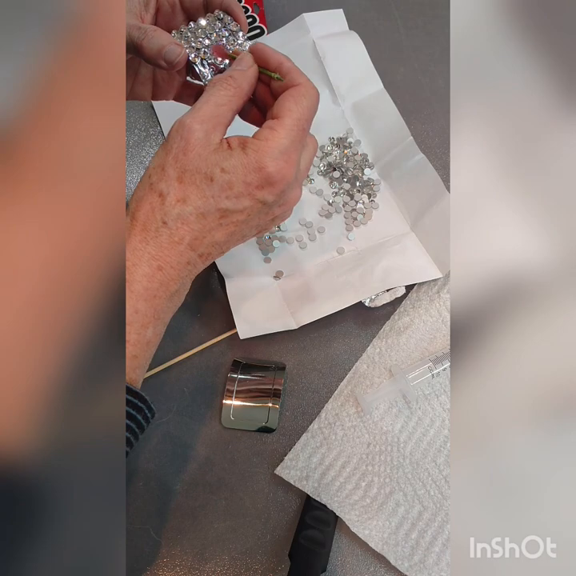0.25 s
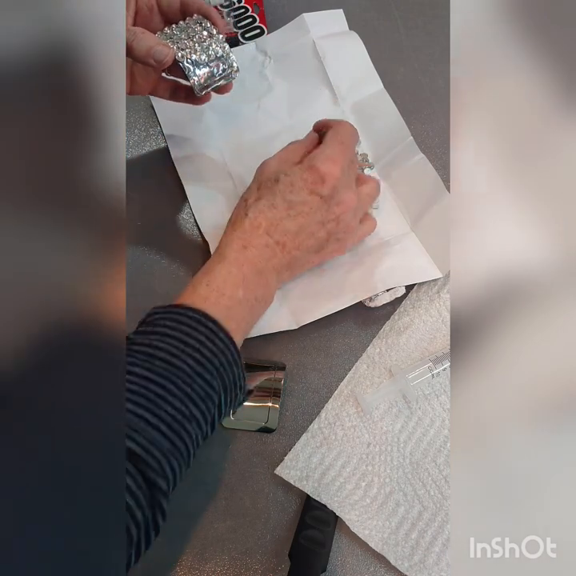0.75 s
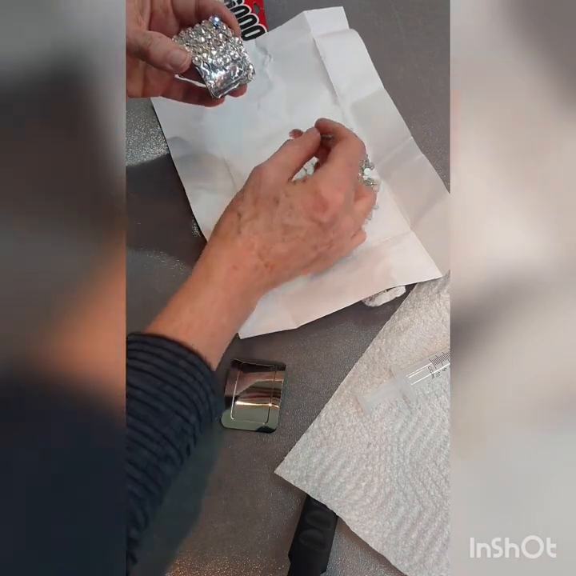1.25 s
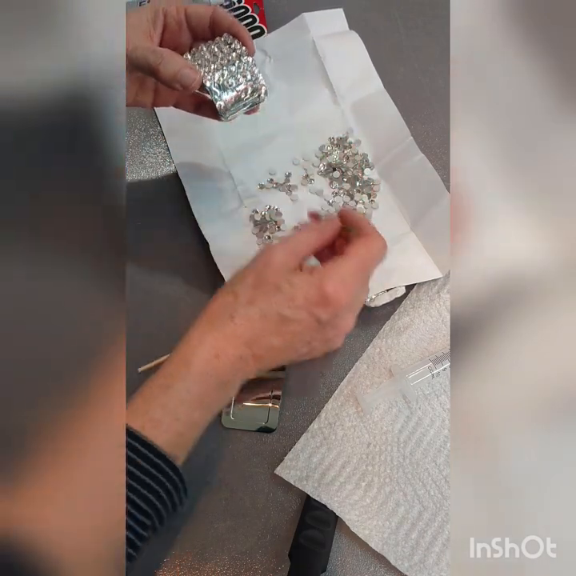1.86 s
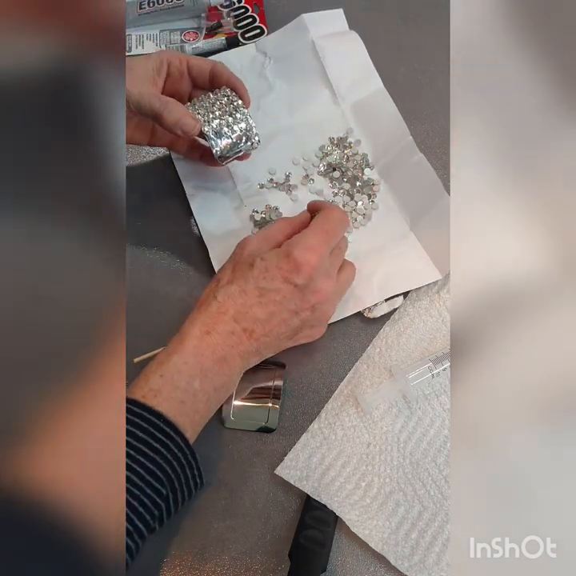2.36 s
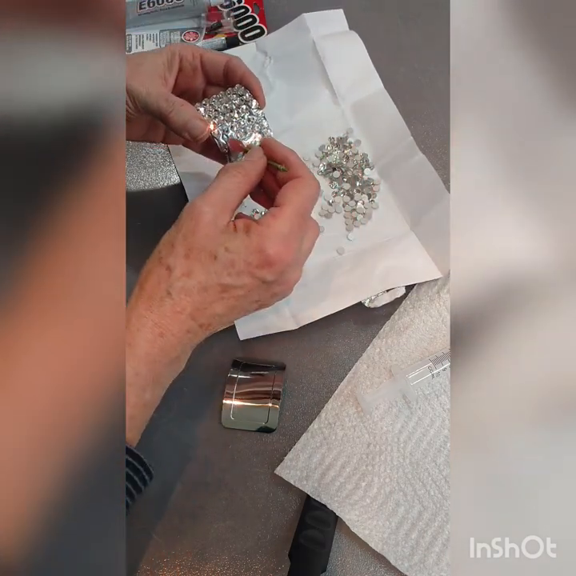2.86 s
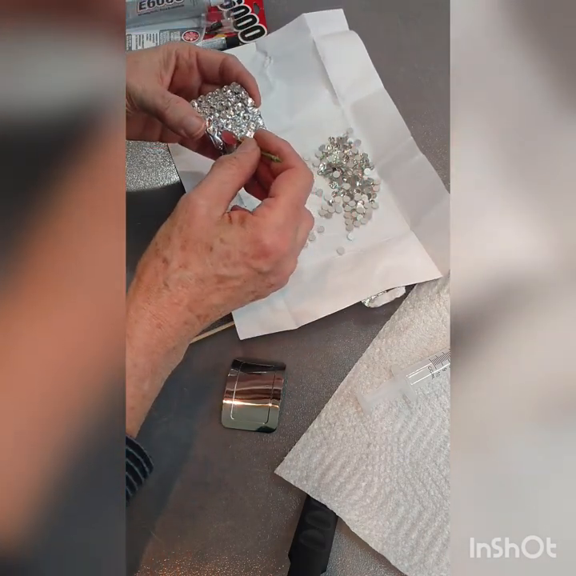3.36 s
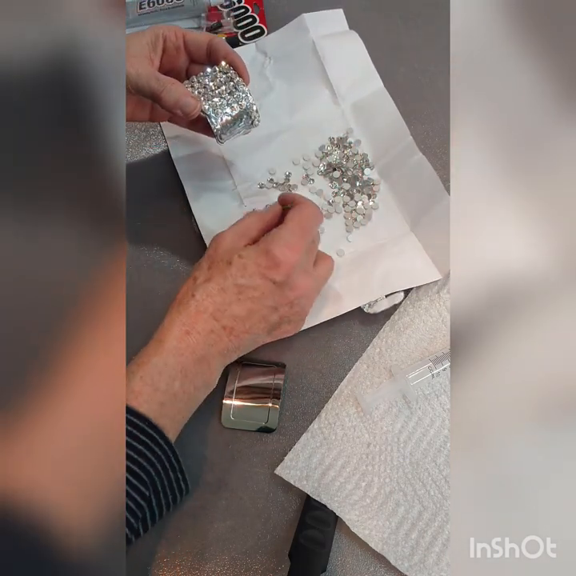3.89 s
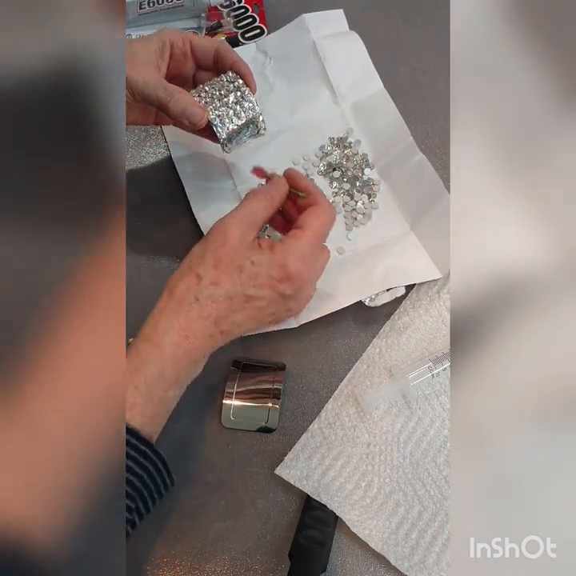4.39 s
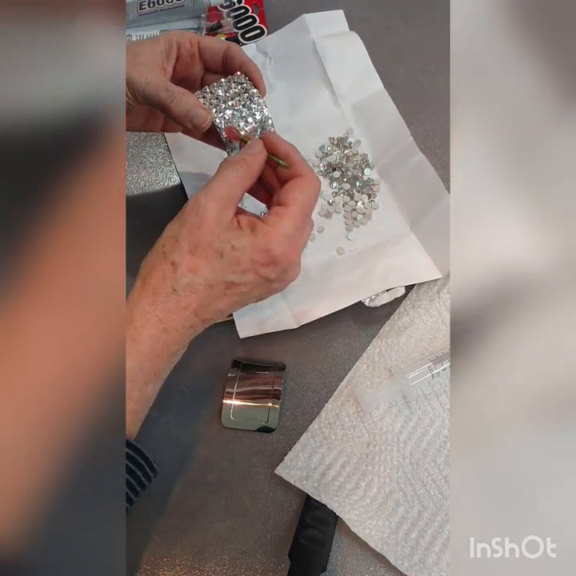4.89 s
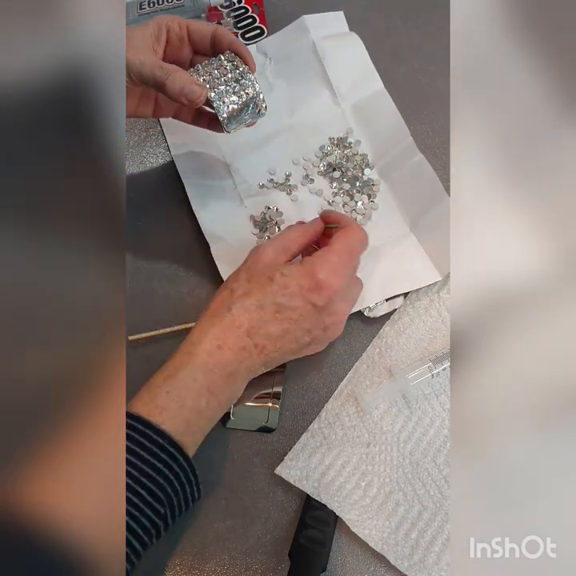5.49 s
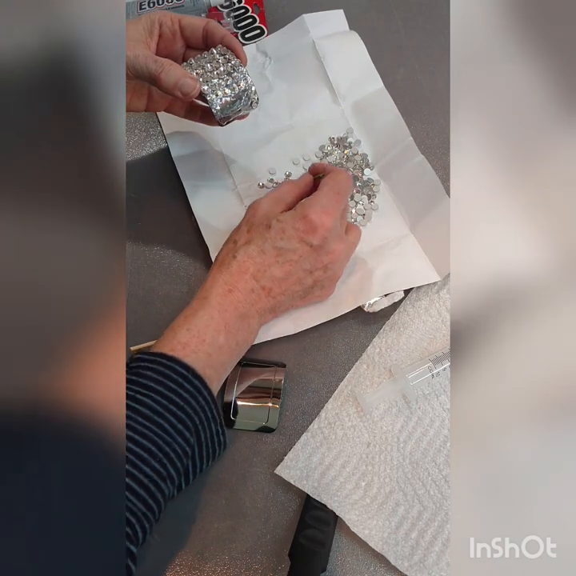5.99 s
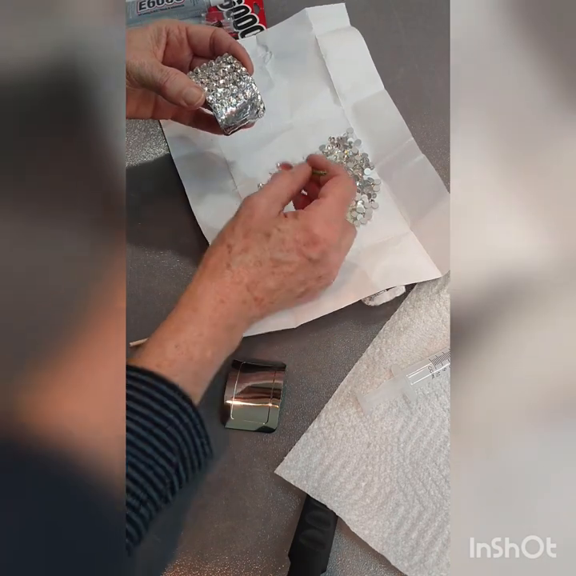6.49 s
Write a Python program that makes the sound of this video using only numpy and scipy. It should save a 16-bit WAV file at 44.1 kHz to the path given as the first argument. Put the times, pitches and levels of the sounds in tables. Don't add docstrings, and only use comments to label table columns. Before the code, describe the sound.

Close to a phone in a quiet room, fingers pick through tiny crystals lying on paper. Soft hiss and faint hum come first, then a busy burst of dry snaps, clicks and gritty rubbing. After a lull with a few dull taps, a shorter picking follows, then another pause and a last burst with longer scrapes, sharp knocks and paper crackle. Wide stereo, with a short dull room tail.

```python
import sys
import numpy as np
from scipy import signal
from scipy.fft import rfft, irfft, next_fast_len
from scipy.io import wavfile

SR = 44100
rng = np.random.default_rng(int(sys.argv[2]) if len(sys.argv) > 2 else 0)


def wav_out(sig):
    wavfile.write(sys.argv[1], SR, np.round(np.clip(np.atleast_2d(sig).T, -1, 1) * 32767).astype(np.int16))


def linear_from_db(decibels):
    return 10 ** (np.asarray(decibels, float) / 20)


N = 297234

# frequency_hz, density_db (per Hz)
AIR_SPECTRUM = [(20, -18), (60, 2), (120, 2.5), (200, 0.5), (400, -5.5), (800, -9), (1500, -13.5),
                (3000, -14.5), (6000, -18), (10000, -20.5), (15500, -28)]
# middle_s, spread_s, level_db
TABLE_LEANS = [
    (2.2, 0.29, -63.5),
    (3.3, 0.63, -78.5),
    (4.5, 0.42, -76),
    (5.55, 0.074, -62),
    (6.0, 0.11, -63),
    (6.56, 0.2, -68),
]
# frequency_hz, width_hz, level_db
SHEET_MODES = [(314, 610, -12), (574, 280, -3), (1320, 2060, -4.5), (2060, 840, 4)]
# frequency_hz, width_hz, level_db
STONE_MODES = [(2700, 1400, -1), (3800, 1600, -1), (5600, 2000, 0)]
# frequency_hz, width_hz, level_db
FIBRE_MODES = [(1940, 1000, -5.5), (3730, 2300, 0.5), (4990, 370, 6), (7040, 2900, 1)]
# frequency_hz, width_hz, level_db
SPARKLE_MODES = [(8640, 4700, 31), (13500, 12000, 1)]
PORT_DELAYS = (3, 2, 0)
# most_pressure_s, rise_s, fall_s, level_db, lightness_db (stones over sheet)
FINGER_DRAGS = [(.85, .04, 0.22, -60.5, 3), (1.036, 0.032, 0.062, -60, -3), (1.171, 0.082, 0.14, -59, 4),
                (1.255, 0.1, 0.016, -59.5, 4), (1.912, 0.026, 0.077, -52, -5),
                (2.004, 0.05, 0.088, -46.5, -0.5), (2.4, 0.089, 0.06, -54.5, -1.5),
                (3.76, 0.056, 0.21, -60, -1.5), (3.976, 0.094, 0.053, -44.5, 5.5),
                (4.165, 0.25, 0.031, -54, -2), (4.242, 0.059, 0.11, -54.5, -1.5),
                (4.37, 0.33, .07, -57, 10), (5.568, 0.045, 0.014, -56.5, -2), (5.69, 0.15, 0.5, -50.5, 2),
                (5.88, 0.16, 0.13, -48.5, 8), (5.99, 0.16, 0.13, -48, 6.5), (6.52, 0.19, 0.036, -50.5, 3),
                (6.54, .04, 0.036, -67, -5)]
# middle_s, length_s, level_db, lightness_db
FINGER_SCUFFS = [(1.585, 0.048, -49, -1.5), (1.642, 0.046, -57, -7.5), (2.058, 0.059, -51, -4),
                 (2.099, 0.21, -55.5, -3), (2.22, 0.053, -58.5, -5), (2.265, 0.056, -46, 0),
                 (2.472, 0.072, -50, -1), (3.832, 0.033, -42, 6), (6.314, 0.074, -45, 1),
                 (6.346, 0.059, -42, -1.5), (1.95, 0.054, -48, -1.5), (6.36, 0.037, -39.5, -9.5),
                 (6.393, 0.12, -52.5, -2)]
# middle_s, length_s, level_db
STONE_GLINTS = [
    (2.083, .06, -58),
    (2.266, 0.054, -54),
    (3.836, .022, -48.5),
    (4.158, 0.032, -60),
    (5.902, 0.14, -51.5),
]
# start_s, peak_db, t60_s
FINGER_TAPS = [(1.927, -38, 0.023), (2.869, -51, 0.02), (2.885, -53, 0.04), (3.077, -43, 0.03),
               (3.806, -53, 0.02), (3.821, -41, 0.023), (4.2657, -36, 0.018), (4.2785, -42, 0.018),
               (4.291, -42, 0.028), (6.456, -34, 0.016), (6.468, -39, 0.02), (6.528, -38, 0.04)]
# start_s, peak_db, thump_db, sparkle_db, t60_s
HEAP_CRUNCHES = [(0.825, -51, -21, -18, 0.05), (1.4674, -34, -11, -17, 0.081),
                 (1.4762, -33, -4, -17, 0.035), (1.5431, -25, -12.5, -22.5, 0.019),
                 (1.5902, -26.5, -11, -18.5, 0.052), (1.7656, -39, -3.5, -10, 0.16),
                 (1.8136, -50, 1, -11, 0.025), (1.9053, -37.5, -8.5, -41, 0.074),
                 (1.9999, -27.5, -5, -53, 0.034), (2.0526, -34, 6, -14, 0.031),
                 (2.2352, -35.5, -4, -30, 0.038), (2.257, -33.5, -9, -24, 0.056),
                 (2.4456, -22.5, -8.5, -41, 0.049), (3.8591, -53, 5, -22, 0.064),
                 (4.1087, -41, -15, -19, 0.033), (4.2302, -39, -10, -15, 0.052),
                 (6.2988, -35, -7, -12.5, 0.084)]
# start_s, peak_db, thump_db, sparkle_db
DRY_SNAPS = [
    (1.4626, -17.5, -8, -24.5),
    (1.6098, -28.5, -14, -35),
    (2.4227, -18, -8.5, -23),
    (1.8089, -35, 0, -8),
    (5.5753, -40, 9.5, -40),
]
# start_s, peak_db, sparkle_db
STONE_TICKS = [(1.029, -51, -23), (1.0466, -50, -18), (1.056, -56, -9), (1.12, -53, -14),
               (1.2508, -65, -18), (1.664, -45.5, -28), (1.7575, -42, -28), (1.7914, -40, -15),
               (1.8925, -37, -40), (1.961, -36, -44), (2.1987, -37.5, -12), (2.3252, -49, -15),
               (2.416, -39, -28), (3.7362, -53, -35), (4.0296, -46, -39), (4.0418, -43.5, -23),
               (4.142, -44, -10), (5.453, -42, -27), (5.467, -38, -40), (5.4993, -40.5, -40),
               (5.533, -53, -7)]
# start_s, peak_db, thump_db, sparkle_db, crackle_t60_s
HARD_KNOCKS = [(1.4641, -23, -16.5, -18, 0.067), (1.6267, -34, -7.5, -29, 0.054),
               (1.7763, -28, -48, -32, 0.1), (1.8022, -25, -48, -31, .06), (2.0578, -28.5, -8, -32, 0.078),
               (2.1578, -28, -9, -17.5, 0.17), (2.45, -26, -5, -31, 0.1), (3.8537, -21.5, -6, -23, 0.053),
               (5.4727, -35, -12.5, -31, 0.18), (5.5749, -29, -6.5, -43, 0.065),
               (6.305, -42, -34, -43, 0.16), (6.357, -20.5, -12, -40, 0.076)]


def ports(x, like, count=0):
    like = np.clip(like, 0, 1)
    shared = np.array([x[0], np.roll(x[0], count)])
    return np.sqrt(like) * shared + np.sqrt(1 - like) * x[1:]


def air():
    level_db, mains_db, mains_hz = -59, -67, 120
    t = np.arange(N) / SR
    size = next_fast_len(N)
    hz = np.arange(size // 2 + 1) * SR / size + 1
    table_hz, table_db = np.transpose(AIR_SPECTRUM)
    colour = linear_from_db(np.interp(np.log(hz), np.log(table_hz), table_db))
    spectrum = rfft(rng.standard_normal((3, size))) * colour
    hiss = irfft(ports(spectrum, 0.49 / (1 + (hz / 400) ** 2)), size)[:, :N]
    sway = linear_from_db(0.38 * np.interp(t, np.arange(30) / 4, rng.standard_normal(30)))
    hum = linear_from_db(mains_db) * np.sin(2 * np.pi * mains_hz * t)
    return linear_from_db(level_db) * sway * hiss / np.std(hiss) + hum


def rumble():
    rest_db, rumble_db = -76, 6.5
    t = np.arange(N) / SR
    weight = linear_from_db(rest_db)
    for middle, spread, db in TABLE_LEANS:
        weight = weight + linear_from_db(db) * np.exp(-((t - middle) / spread) ** 2 / 2)
    band = signal.butter(2, [60, 230], "bandpass", fs=SR, output="sos")
    low = signal.sosfilt(band, rng.standard_normal((3, N)))
    return weight * linear_from_db(rumble_db) * ports(low, 0.71) / np.std(low)


def room(x):
    level_db, t60_s = -13, 0.2
    t = np.arange(int(.3 * SR)) / SR
    tail = rng.standard_normal((2, len(t))) * linear_from_db(-60 * t / t60_s) * (t > .004)
    tail = signal.lfilter([1], [1, -.6], tail)
    tail = tail / np.sqrt(np.sum(tail[0] ** 2))
    return linear_from_db(level_db) * signal.fftconvolve(x, tail, axes=1)[:, :N]


def bands(modes, hz):
    return sum(linear_from_db(db) * 1j * hz * w / (f * f - hz * hz + 1j * hz * w) for f, w, db in modes)


def colours(x, stone_modes, detune=0.94):
    length = x.shape[-1]
    size = next_fast_len(length)
    hz = np.arange(size // 2 + 1) * SR / size * detune
    spectrum = rfft(x, size)
    sheet = bands(SHEET_MODES, hz) / (1 + 1j * hz / 2600) ** 2
    stones = bands(stone_modes, hz) / (1 + 1j * hz / 7500) ** 3 / (1 + 1500 / (1j * hz + 1)) ** 2
    sparkle = bands(SPARKLE_MODES, hz) / (1 + 6500 / (1j * hz + 1)) ** 2
    layers = []
    for response in (sheet, stones, sparkle):
        gain = np.sqrt(np.mean(abs(response) ** 2))
        layers.append(irfft(spectrum * response, size)[..., :length] / gain)
    return layers


def grit(size, spread_db, grain_s):
    grain = max(int(grain_s * SR), 1)
    heights = np.minimum(rng.exponential(size=size), 4)[:size // grain + 1]
    jumps = np.repeat(linear_from_db(spread_db * heights), grain)[:size]
    return rng.standard_normal((3, size)) * jumps / np.sqrt(np.mean(jumps ** 2))


def mix(layers, low_db, mid_db, high_db):
    likeness = (.7, .25, .35)
    sheet, stones, sparkle = (ports(x, like, lag) for x, like, lag in zip(layers, likeness, PORT_DELAYS))
    shade = linear_from_db(np.array([[1.5], [-1.5]]))
    return linear_from_db(low_db) * sheet + shade * (linear_from_db(mid_db) * stones + linear_from_db(high_db) * sparkle)


def scrapes():
    sheet_db, glint_db, scrape_db = -4.5, -10, 1.5
    stroke_round = 1.9
    t = np.arange(N) / SR
    power = np.full((3, N), 1e-12)
    scuffs = [(s, length / 2, length / 2, db, light) for s, length, db, light in FINGER_SCUFFS]
    for s, rise, fall, db, light_db in FINGER_DRAGS + scuffs:
        stroke = np.interp(t, [s - rise, s, s + fall], [0, 1, 0]) ** stroke_round
        balance_db = np.array([[sheet_db - light_db], [0], [glint_db]])
        power += linear_from_db(2 * (db + balance_db)) * stroke
    for s, length, db in STONE_GLINTS:
        power[2] += linear_from_db(2 * db) * np.interp(t, [s - length / 2, s, s + length / 2], [0, 1, 0])
    low_db, mid_db, high_db = 10 * np.log10(power) + scrape_db
    grains = grit(N, spread_db=1.8, grain_s=.001)
    return mix(colours(grains, FIBRE_MODES), low_db + 0.5, mid_db, high_db + .5)


def add(out, s, shape, lead, db, low_db, high_db):
    contact = 2.2
    burst = shape * grit(len(shape), spread_db=1.8, grain_s=.0007)
    weighted = np.sum((shape * burst) ** 2, axis=1, keepdims=True)
    burst = burst * np.sqrt(np.sum(shape ** 4) / weighted)
    burst[:, lead + 12] += contact * shape[lead]
    brightness_db = np.clip(.15 * (high_db + 20), -2.5, 1.5)
    detune = linear_from_db(.5 * rng.standard_normal() - brightness_db)
    hit = mix(colours(burst, STONE_MODES, detune), db + low_db + 5.5, db, db + high_db + 5.5)
    i = int(s * SR) - lead + 16
    out[:, i:i + len(shape)] += hit[:, :N - i]


def ticks():
    tick_db, crunch_db = -6, -5.5
    tick_s, rise_s, swell_s = .0008, .0003, .0052
    out, size, lead = np.zeros((2, N)), 8192, 128
    t = (np.arange(size) - lead) / SR
    after = np.maximum(t, 0)
    # start_s, peak_db, thump_db, sparkle_db, t60_s, crackle_db
    blows = [(*row, -4.5) for row in HARD_KNOCKS]
    blows += [(s, db, -9, high_db, 0.12, -2.5) for s, db, high_db in STONE_TICKS]
    blows += [(*row, 0.064, -15) for row in DRY_SNAPS]
    for s, db, low_db, high_db, t60, crackle_db in blows:
        decay = np.exp(-after / tick_s) + linear_from_db(crackle_db - 60 * after / max(t60, .005))
        onset = np.exp(np.minimum(t, 0) / rise_s)
        add(out, s, decay * onset, lead, db + tick_db, low_db, high_db)
    for s, db, low_db, high_db, t60 in HEAP_CRUNCHES:
        swell = np.minimum(after / swell_s, 1)
        decay = linear_from_db(-60 * np.maximum(t - swell_s, 0) / max(t60, .005))
        add(out, s, swell * decay, lead, db + crunch_db, low_db, high_db)
    for s, db, t60 in FINGER_TAPS:
        decay = (t >= 0) * linear_from_db(-60 * after / max(t60, .005))
        add(out, s, decay, lead, db - 20, 11, -27)
    return out


def scene():
    hands = ticks() + scrapes()
    return hands + room(hands) + rumble() + air()


def top_cut(x):
    return signal.sosfilt(signal.butter(12, 16520, fs=SR, output="sos"), x)


def record(dry):
    lag, gain, blur, top_hz = 17, .79, .13, 15400
    late = np.pad(dry[::-1], ((0, 0), (lag, 0)))[:, :N]
    curvature = np.roll(late, 1, axis=1) - 2 * late + np.roll(late, -1, axis=1)
    late = late + blur * curvature
    low_pass = signal.ellip(8, .3, 40, top_hz, fs=SR, output="sos")
    wide = signal.sosfilt(low_pass, dry - gain * late)
    return top_cut(wide)


dry = scene()
out = record(dry)
wav_out(out)
```